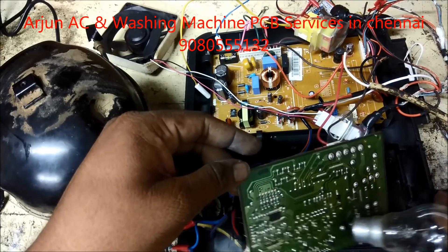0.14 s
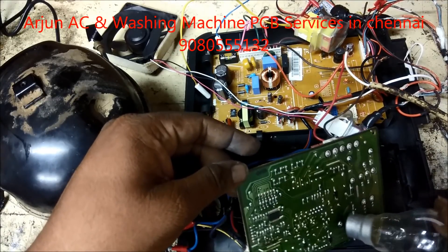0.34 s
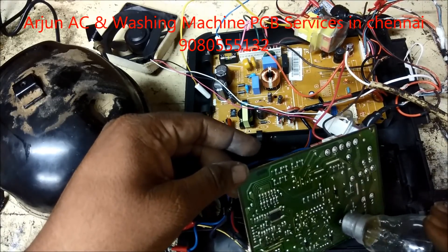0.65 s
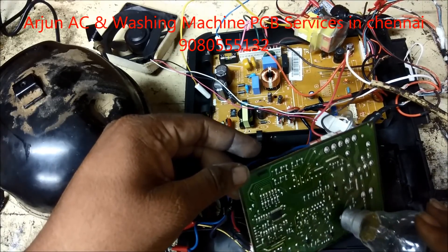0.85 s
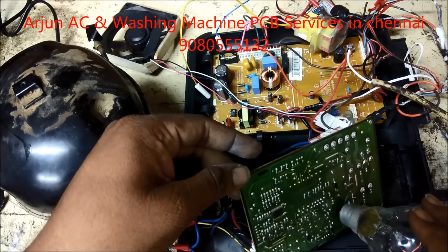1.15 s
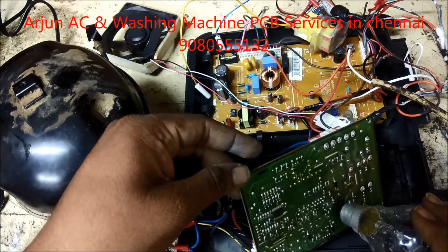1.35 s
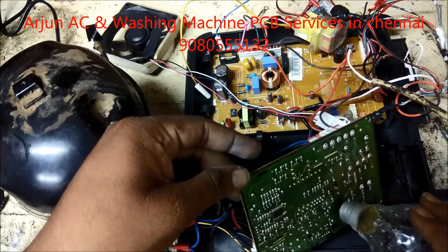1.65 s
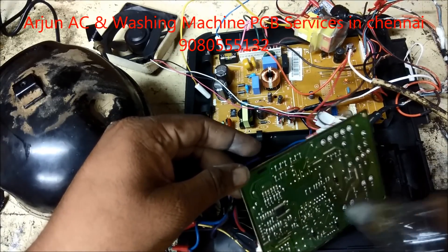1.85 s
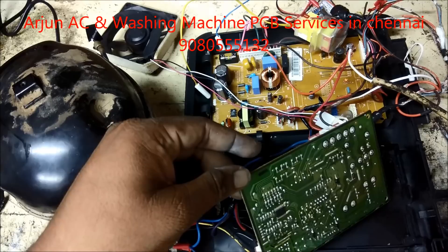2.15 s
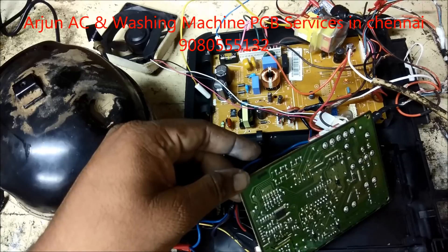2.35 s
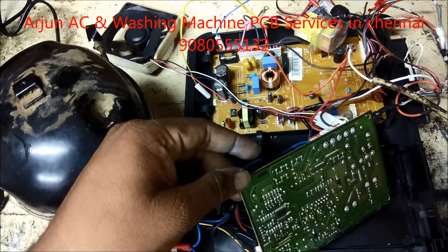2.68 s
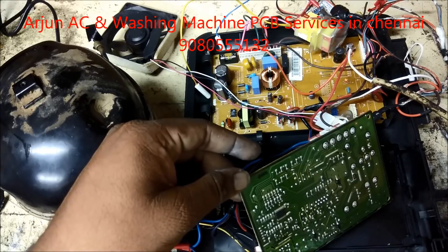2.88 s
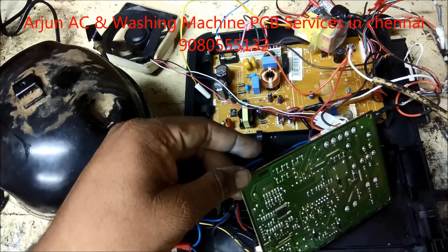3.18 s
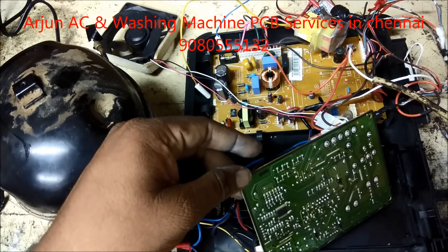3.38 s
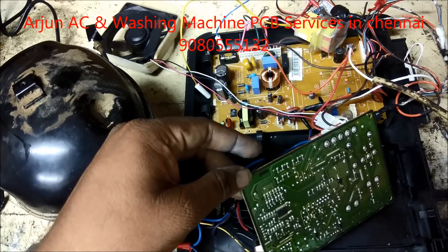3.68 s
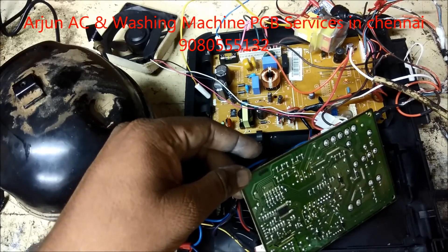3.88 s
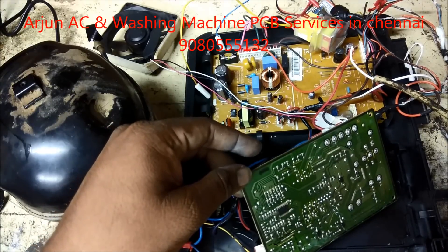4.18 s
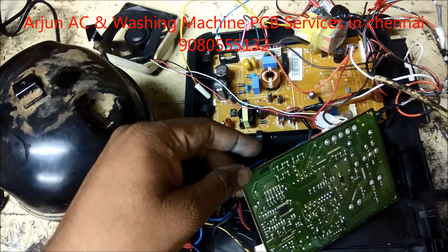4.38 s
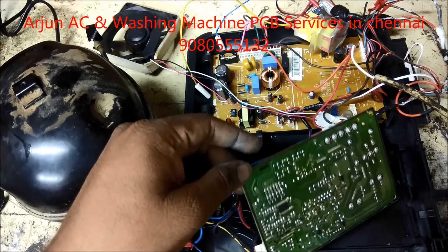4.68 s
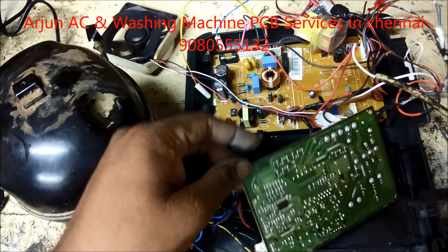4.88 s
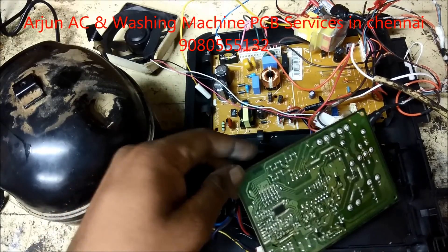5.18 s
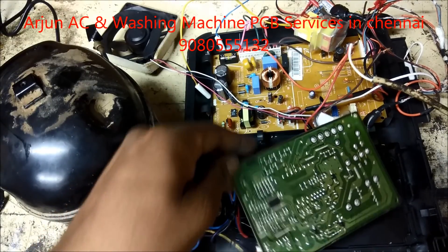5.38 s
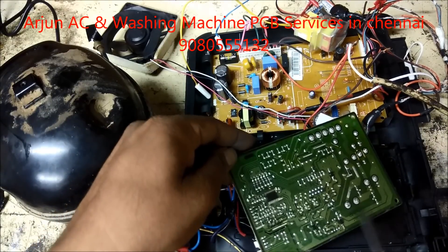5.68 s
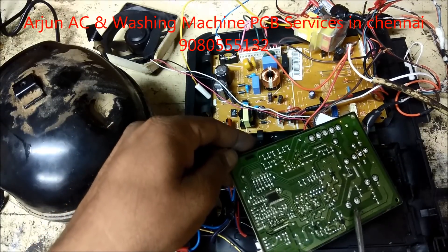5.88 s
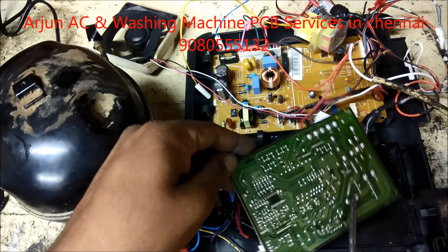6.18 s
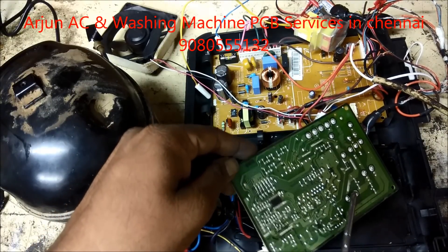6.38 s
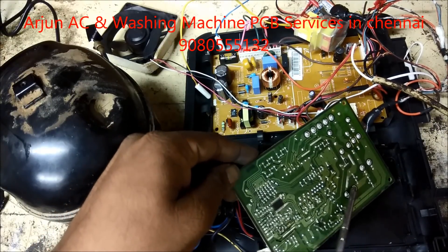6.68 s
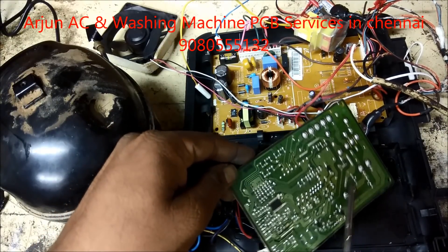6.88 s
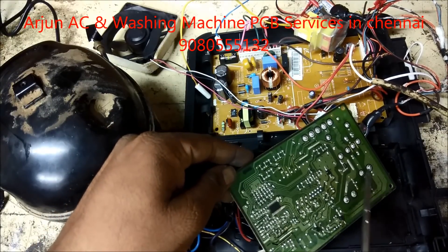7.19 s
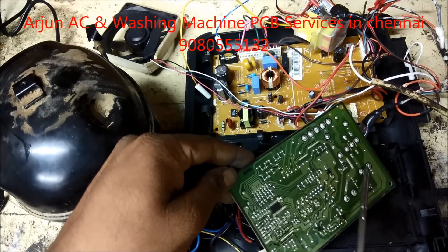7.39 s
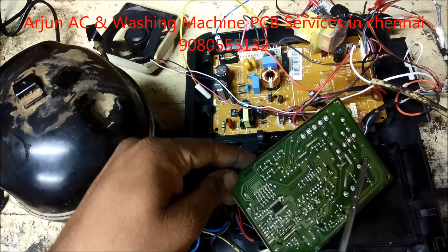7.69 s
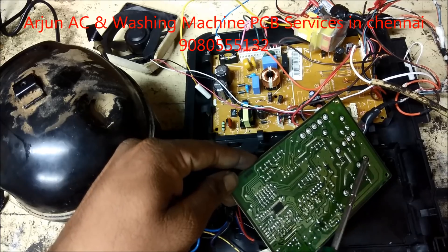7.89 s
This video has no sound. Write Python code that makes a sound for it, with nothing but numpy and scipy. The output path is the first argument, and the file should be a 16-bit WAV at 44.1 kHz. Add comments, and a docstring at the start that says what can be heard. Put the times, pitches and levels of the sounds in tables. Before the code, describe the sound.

In a small workshop a fan hums faintly and ticks about ten times a second, thin and high. A handheld stereo microphone catches low fluttering draught. Soft thumps and light brushing come first, then small taps near four seconds. A rattly cluster builds to one loud hard clack on a circuit board just after five seconds, followed by a few brighter, sparser taps.

```python
"""A small workshop: a circuit board is turned over and tapped with a screwdriver on a cluttered bench.
Knocks are short noise rattles that ring the board's modes; brushing strokes are noise grains ringing small parts.
A fan hums as resonant air noise and ticks about ten times a second in narrow high rings.
Its draught is lumpy low noise and single puffs on the two ports of a handheld microphone; soft low thumps ring too."""
import sys
import numpy as np
from scipy import signal
from scipy.fft import rfft, irfft, next_fast_len
from scipy.io import wavfile

SR = 44100
rng = np.random.default_rng(int(sys.argv[2]) if len(sys.argv) > 2 else 0)


def digitize_waveform(pressure):
    """Quantize a signal to 16-bit integers and store it at the path in sys.argv[1].

    Rows of a 2-D input are taken as channels; values are limited to [-1, 1].
    """
    field = np.atleast_2d(pressure).T
    bounded = np.clip(field, -1, 1)
    quanta = np.round(bounded * 32767).astype(np.int16)
    wavfile.write(sys.argv[1], SR, quanta)


N = 354740


def amp(db):
    """Amplitude factor of a level in dB."""
    return 10 ** (np.asarray(db) / 20)


def rms_one(x):
    """Scale to an RMS of 1."""
    return x / np.sqrt(np.mean(x ** 2) + 1e-20)


def in_time(rows):
    """Columns joined by straight lines, one value a sample."""
    s, *columns = np.transpose(rows)
    return [np.interp(np.arange(N) / SR, s, c) for c in columns]


def pan(pan_db):
    """Left and right dB of a source whose left-right difference is split evenly."""
    return np.array([[pan_db / 2], [-pan_db / 2]])


def port_hit(pan_db):
    """Left and right dB with the louder port at 0 dB."""
    return np.minimum([[pan_db], [-pan_db]], 0)


def band(x, low_hz, high_hz, order=2):
    """Butterworth bandpass."""
    return signal.sosfilt(signal.butter(order, [low_hz, high_hz], "band", fs=SR, output="sos"), x)


def resonance(x, hz, width_hz):
    """Two-pole resonance, about unity gain on top."""
    r = np.exp(-np.pi * width_hz / SR)
    feedback = [1, -2 * r * np.cos(2 * np.pi * hz / SR), r * r]
    return signal.lfilter([(1 - r * r) / 2, 0, (r * r - 1) / 2], feedback, x)


def steep_resonance(x, hz, width_hz):
    """The same resonance twice in series: steeper skirts."""
    return resonance(resonance(x, hz, width_hz), hz, width_hz)


def body(x, modes):
    """Resonances side by side, signs alternating."""
    return sum((-1) ** k * amp(db) * resonance(x, hz, width_hz) for k, (hz, width_hz, db) in enumerate(modes))


def drift(rate_hz):
    """Slow random curve of spread 1: noise through a double lag, computed at SR / 40."""
    r = np.exp(-80 * np.pi * rate_hz / SR)
    white = rng.standard_normal(N // 40 + 2002)
    slow = signal.lfilter([1], [1, -2 * r, r * r], white)[2000:]  # skip the filter's start
    return np.interp(np.arange(N) / 40, np.arange(len(slow)), rms_one(slow))


def bursts(times_s, level_db, t60_s, rise_s):
    """An envelope that rises fast at each time and dies away."""
    marks = np.full(N, 1e-18)
    marks[(np.asarray(times_s) * SR).astype(int)] = amp(level_db)
    decay = signal.lfilter([1], [1, -amp(-60 / (t60_s * SR))], marks)
    rise = np.exp(-1 / (rise_s * SR))
    return signal.lfilter([1 - rise], [1, -rise], decay)


def air_noise(modes, patchy_db, alike):
    """Air noise in housing and room resonances; each flickers on its own; the shared part reaches right later."""
    shared, left, right = rng.standard_normal((3, N))
    lagged = np.array([shared, np.roll(shared, 10)])
    air = np.sqrt(alike) * lagged + np.sqrt(1 - alike) * np.array([left, right])
    out = 0
    for hz, width_hz, left_db, right_db in modes:
        ringing = steep_resonance(air, hz, 1.5 * width_hz) / np.sqrt(width_hz)
        out = out + ringing * amp([[left_db], [right_db]]) * amp(patchy_db * drift(9.2))
    return rms_one(out)


# Hum level over time. Each row: time in seconds, lowest drone in relative dB, drone above it in relative dB.
HUM_LEVELS = [(0.0, -54, -54), (0.65, -64, -62.5), (2.04, -61, -59), (2.78, -55.5, -57), (3.18, -59, -58.5),
              (4.34, -57.5, -63), (4.86, -63.5, -64.5), (5.22, -61.5, -53.5), (5.66, -60, -65),
              (5.98, -65.5, -62.5), (7.59, -66, -67), (8.04, -63.5, -59.5)]
# Upper hum level over time. Each row: time in seconds, relative level in dB.
WHIRR_LEVELS = [(0.0, -58.5), (0.92, -56.5), (1.23, -58.5), (4.77, -57.5), (5.19, -54.5), (5.37, -58),
                (7.72, -63), (8.04, -60)]
# Hum resonances, three groups. Each row: pitch in Hz, nominal width in Hz, left in dB, right in dB.
HUM_LOW_MODES = [(251.6, 41, -17, -10.5), (311, 76, -2.5, -5)]
HUM_MID_MODES = [(458.4, 18, -3, -20), (534.4, 60.4, 7.5, -14), (688.5, 9.7, -23, -14.5)]
HUM_UPPER_MODES = [(941.5, 49, 9, -10.5), (1054.5, 70, -1, 10), (1330, 58, -2.5, 6.5), (1478, 250, 9.5, -4),
                   (1833, 90, -6.5, 0), (2174, 110, 1, -5), (2484, 235, 2.5, -4), (2907, 46, 1, -13),
                   (3470, 48, -21.5, -3), (4614, 70, -26.5, -16)]
HUM_LOW_GAIN_DB, HUM_MID_GAIN_DB, WHIRR_GAIN_DB = 4.5, 8, 1


def fan_hum():
    """Three groups of air resonances, from ports alike at the bottom to mostly independent at the top."""
    low_db, mid_db = in_time(HUM_LEVELS)
    whirr_db = in_time(WHIRR_LEVELS)[0]
    low = amp(low_db + HUM_LOW_GAIN_DB) * air_noise(HUM_LOW_MODES, patchy_db=4.3, alike=1.0)
    mid = amp(mid_db + HUM_MID_GAIN_DB) * air_noise(HUM_MID_MODES, patchy_db=5.17, alike=0.7)
    upper = amp(whirr_db + WHIRR_GAIN_DB) * air_noise(HUM_UPPER_MODES, patchy_db=3.0, alike=0.26)
    return low + mid + upper


# Gusts. Each row: start in seconds, hold in seconds, relative dB at the port hit, left-right in dB.
GUSTS = [(0.006, 0.22, -47.5, 26), (0.34, 0.013, -37, 23), (0.83, 0.031, -43, -32), (1.47, 0.014, -49, -22),
         (1.857, 0.0073, -47, 25), (3.116, 0.048, -44, -29), (3.36, 0.018, -46.5, -26),
         (3.556, 0.022, -40, -24), (4.073, 0.22, -49, 12), (4.255, 0.3, -36, 12), (4.77, 0.15, -35, 27),
         (4.953, 0.34, -40, 2.5), (5.513, 0.037, -32.5, 40), (5.59, 0.051, -43, 16),
         (6.508, 0.076, -46, 27), (6.993, 0.024, -45.5, 32), (7.201, 0.017, -41, 15),
         (7.39, 0.024, -41.5, -7.5), (7.451, 0.13, -38, -34.5), (7.775, 0.077, -46.5, 25),
         (7.87, 0.038, -34, 29)]
GUST_RISE_DB_PER_S, GUST_FALL_DB_PER_S = 799.5, 296.5
CALM_DB, GUST_GAIN_DB = -76, 22.0  # the gain lifts calm and gusts alike


def draught():
    """Lumpy low noise, its own on each port, in the band the ports let through; gusts rise, hold and fall."""
    t, level_db = np.arange(N) / SR, np.full((2, N), float(CALM_DB))
    for s, hold_s, peak_db, pan_db in GUSTS:
        rise_db = -GUST_RISE_DB_PER_S * np.maximum(s - t, 0)
        fall_db = -GUST_FALL_DB_PER_S * np.maximum(t - s - hold_s, 0)
        level_db = np.maximum(level_db, peak_db + rise_db + fall_db + port_hit(pan_db))
    lumps = amp(6.5 * np.clip([drift(30), drift(21)], -3, 1.4))  # the flutter has a ceiling
    push = amp(level_db + GUST_GAIN_DB) * rms_one(lumps * rng.standard_normal((2, N)))
    steady = amp(-50) * band(rng.standard_normal((2, N)), 68, 150, order=3)  # faint rumble underneath
    main = band(push, 117.6, 212.6, order=3)
    lower = amp(-1) * band(push, 88, 107.3, order=3)
    lowest = amp(-19.5) * band(push, 21, 70)
    return steady + main + lower + lowest


def narrow_rings(x, modes):
    """Narrow rings with dark gaps between them."""
    return sum(amp(db) * steep_resonance(x, hz, 1.2 * width_hz) for hz, width_hz, db in modes)


# Fan rotation. Each row: time in seconds, turn count.
FAN_TURNS = [(0.025, 0), (1.69, 17), (4.414, 45), (6.292, 64), (8.057, 82)]
# Ticks that stand out. Each row: turn count, relative level in dB.
LOUD_TICKS = [(0, -50.5), (2, -41), (3, -38), (5, -51), (6, -55), (7, -43), (8, -48.5), (9, -54.5),
              (10, -39), (11, -45), (12, -48.5), (13, -47), (15, -40), (17, -54), (18, -48), (19, -37),
              (20, -49.5), (22, -42), (23, -36.5), (27, -44), (28, -47.5), (30, -40), (31, -41),
              (32, -44.5), (33, -62), (34, -43), (40, -47.5), (41, -37), (42, -47), (43, -43), (44, -44.5),
              (45, -49), (47, -37.5), (48, -38), (50, -51), (52, -38.5), (56, -48), (59, -49), (62, -51),
              (64, -48), (68, -47), (69, -33), (78, -46.5), (79, -41)]
# Tick rings, upper and lower. Each row: pitch in Hz, nominal width in Hz, level in dB.
TICK_UPPER_MODES = [(14400, 300, 0), (15400, 300, -4)]
TICK_LOWER_MODES = [(11535, 350, 3), (9210, 230, -10.5), (6580, 750, -12.5), (4594, 280, -3)]
FAINT_TICK_DB, FAINT_SPREAD_DB = -64.5, 5
TICK_LOWER_DB, LOWER_SPREAD_DB = -11, 4  # relative to the upper rings' drive
TICK_JITTER_S, TICK_LEAD_S, TICK_GAIN_DB = 0.0015, 0.002, 9.0


def ticks():
    """A loose part of the fan is flicked once a turn and jingles in narrow high rings."""
    fan_s, fan_turn = np.transpose(FAN_TURNS)
    s = np.interp(np.arange(fan_turn[-1]), fan_turn, fan_s)
    level_chance, lower_chance, time_chance = rng.standard_normal((len(s), 3)).T
    s = s + TICK_JITTER_S * time_chance - TICK_LEAD_S
    level_db = FAINT_TICK_DB + FAINT_SPREAD_DB * level_chance
    turn, loud_db = np.transpose(LOUD_TICKS)
    level_db[np.round(turn).astype(int)] = loud_db
    lower_db = level_db + TICK_LOWER_DB + LOWER_SPREAD_DB * np.minimum(lower_chance, 1)
    white = rng.standard_normal((2, N))
    upper_drive = white[0] * bursts(s, level_db, t60_s=0.031, rise_s=0.0028)
    lower_drive = white[1] * bursts(s, lower_db, t60_s=0.055, rise_s=0.0006)
    upper = narrow_rings(upper_drive, TICK_UPPER_MODES)
    lower = narrow_rings(lower_drive, TICK_LOWER_MODES)
    return amp(TICK_GAIN_DB) * (upper + lower)


ROOM_T60_S, ROOM_DB = 0.23, 0.5


def room(x):
    """A dense tail of echoes, another one at each port."""
    t = np.arange(SR // 2) / SR
    tail = rng.standard_normal((2, len(t))) * amp(-60 * t / ROOM_T60_S) * np.clip(t / 0.00027, 0, 1)
    tail -= 0.42 * band(tail, 100, 2400, order=1)  # close lows and mids stay drier than the treble
    tail /= np.sqrt(np.sum(tail ** 2, axis=1, keepdims=True))
    return amp(ROOM_DB) * signal.fftconvolve(x, tail, axes=1)[:, :N]


# Soft low thumps, perhaps through the bench.
# Each row: time in seconds, relative peak in dB, ring in Hz, left-right in dB.
THUMPS = [(0.039, -40.5, 540, 10), (0.622, -41.5, 346, -2), (1.6, -37, 334, 3), (1.798, -40, 325, 3),
          (2.594, -31.5, 762, 0), (2.605, -32.5, 333, 3), (2.635, -41.5, 712, 6), (2.664, -36.5, 353, 0),
          (2.893, -43.5, 530, 23), (3.353, -44, 307, 8), (3.576, -34, 744, 6), (3.743, -38.5, 331, 9),
          (3.988, -35, 340, 4), (4.071, -40, 338, 0), (4.108, -38.5, 385, 9), (5.316, -37, 534, -5),
          (6.101, -41, 552, 14), (6.221, -43.5, 316, 6), (6.65, -45, 555, 17), (7.043, -43, 324, 6)]
THUMP_T60_S, THUMP_RISE_S, THUMP_WIDTH_HZ, THUMP_GAIN_DB = 0.078, 0.0014, 62, -2
THUMP_LEAD_S = 0.007  # the ring builds up before it is heard


def thumps():
    """A short puff of noise sets one low resonance ringing."""
    out, t = np.zeros((2, N + SR)), np.arange(SR // 5) / SR
    whites = rng.standard_normal((len(THUMPS), len(t)))
    for (s, level_db, hz, pan_db), white in zip(THUMPS, whites):
        puff = white * (1 - np.exp(-t / THUMP_RISE_S)) * amp(-60 * t / THUMP_T60_S)
        ringing = steep_resonance(puff, hz, THUMP_WIDTH_HZ)
        ringing = ringing / np.abs(ringing).max()
        at = int((s - THUMP_LEAD_S) * SR)
        out[:, at:at + len(t)] += amp(level_db + THUMP_GAIN_DB + pan(pan_db)) * ringing
    return out[:, :N]


GRIT_DB = 4  # scale of the random boost of single grains, in knocks and slides


def grit(shape):
    """Random boost of single noise grains."""
    return amp(GRIT_DB * np.minimum(rng.exponential(1, shape), 5))


# Knocks. Each row: time in seconds, relative level in dB, centre of the colour in Hz,
# fall away from it in dB per octave, left-right in dB, ring in dB.
KNOCKS = [(0.947, -26, 9400, 15, 1, 0), (2.935, -33.5, 3850, 9, -7.5, -1),
          (3.574, -28.5, 5130, 5, -11.5, 0), (3.682, -34.5, 6800, 3, 1, -13),
          (3.976, -21, 6800, 9.5, 4, -13), (4.873, -44, 960, 5, -6, 25.5),
          (4.907, -38.5, 1450, 9.5, 2, 18.5), (4.95, -26.5, 1370, 12, 1, -12.5),
          (5.009, -15.5, 1620, 6, 0, -0.5), (5.034, -30, 1790, 7, 1.5, -7),
          (5.074, -24.5, 1100, 6.5, 4, -6), (5.11, -19.5, 900, 9.5, -5, -5),
          (5.117, -19, 650, 9.5, 14, -6.5), (5.133, -25, 650, 12.5, 1.5, -9.5),
          (5.155, -31, 650, 5, 3, -11), (5.22, 0, 1490, 8, -1.5, -3), (5.224, -10, 1570, 9.5, 1, -5.5),
          (5.237, -18, 696, 12, 10, -13), (5.255, -15, 600, 15.5, 1, 0), (5.261, -25, 4540, 3.5, 6, 0),
          (5.317, -28, 3370, 1, 3, -8), (5.388, -32.5, 8900, 7.5, 1.5, 10.5),
          (5.59, -10, 5300, 7.5, 4.5, 8.5), (6.263, -40.5, 962, 27, 5, 22), (6.493, -27, 8200, 9, 4.5, -6),
          (6.894, -30, 4970, 2.5, 2.5, 1), (7.185, -15.5, 5240, 9, 2, 21), (7.194, -39, 4100, 2, -11, 13),
          (7.287, -34.5, 5740, 8, -3, -7)]
# Contact noise bands. Each row: low edge in Hz, high edge in Hz, contact t60 in seconds.
KNOCK_BANDS = [(756, 1600, 0.019), (236, 810, 0.04), (1950, 3270, 0.016), (3073, 4900, 0.027),
               (4577, 7800, 0.021), (9100, 14600, 0.029)]
# Board modes. Each row: pitch in Hz, width in Hz, level in dB.
BOARD_MODES = [(550, 31, 0.5), (924, 27, 3), (1045, 43, -3.5), (1380, 110, 4.5), (1570, 80, -0.5),
               (1715, 150, 0), (2183, 80, 0), (2340, 140, 5), (2810, 160, -3), (3270, 110, -5.5),
               (3860, 450, -8)]
KNOCK_RISE_CYCLES = 1.6  # of the centre pitch: dull knocks start softer
RINGS_BELOW_HZ, TAP_RING_HZ = 1500, 1010  # duller knocks ring at their centre, brighter ones at TAP_RING_HZ
KNOCK_RING_WIDTH_HZ = 90
TAP_THUD_DB = -24  # a bright tap hardly moves the bench
TAP_DIP_DB, TAP_DIP_HZ = -2, 2600  # nor does it stir the board's bending modes around this pitch much
MODE_SPREAD_DB, MODE_SHIFT = 2.5, 0.02  # hold and hit point change each mode's strength and pitch
LOUD_DB, DRIER_PER_DB = -7.5, 0.54  # knocks above this level are nearer and stir the room less


def knocks():
    """Contacts are short noise rattles around a centre; the part hit rings. Returns direct sound, room share."""
    out, t = np.zeros((2, 2, N)), np.arange(SR // 5) / SR
    whites = rng.standard_normal((len(KNOCKS), len(t)))
    contacts = np.minimum(rng.standard_normal((len(KNOCKS), len(t) // 60)), 1)
    whites *= amp(5 * np.repeat(contacts, 60, axis=1))  # uneven micro-contacts
    whites *= grit(whites.shape)
    holds = rng.standard_normal((len(KNOCKS), len(BOARD_MODES), 2))
    for (s, level_db, centre_hz, fall_db, pan_db, ring_db), white, hold in zip(KNOCKS, whites, holds):
        rattle, rising = 0, 1 - np.exp(-t * centre_hz / KNOCK_RISE_CYCLES)
        for low_hz, high_hz, t60_s in KNOCK_BANDS:
            octaves = abs(np.log2(np.sqrt(low_hz * high_hz) / centre_hz))
            thin_db = TAP_THUD_DB if centre_hz > 5 * high_hz else 0
            if low_hz < TAP_DIP_HZ < high_hz and centre_hz > 1.5 * TAP_DIP_HZ:
                thin_db += TAP_DIP_DB
            shape = rising * amp(thin_db + level_db - fall_db * octaves - 60 * t / t60_s)
            # scaled up to stay clear of the floor in rms_one
            noise = band(1e3 * white * shape / shape.max(), low_hz, high_hz, order=3)
            rattle = rattle + rms_one(noise) * np.sqrt(np.mean(shape ** 2))
        ring_hz = centre_hz if centre_hz < RINGS_BELOW_HZ else TAP_RING_HZ
        rattle = rattle + amp(ring_db) * resonance(rattle, ring_hz, KNOCK_RING_WIDTH_HZ)
        modes = [(hz * (1 + MODE_SHIFT * shift), width_hz, db + MODE_SPREAD_DB * spread)
                 for (hz, width_hz, db), (shift, spread) in zip(BOARD_MODES, hold)]
        knock = amp(-5.5) * rattle + body(rattle, modes)
        at = int((s - 0.001) * SR)
        sent_db = -DRIER_PER_DB * max(level_db - LOUD_DB, 0)
        out[..., at:at + len(t)] += knock * amp(pan(pan_db)) * amp([[[0]], [[sent_db]]])
    return out


# Fingers and wires brushing the board.
# Each row: start in seconds, hold in seconds, relative level in dB, low edge in Hz, high edge in Hz, t60 in seconds.
SLIDES = [(2.29, 0, -54, 10000, 15700, 0.27), (2.337, 0.036, -42, 10800, 15000, 0.09),
          (2.472, 0.033, -44.5, 10800, 14700, 0.17), (2.83, 0.0067, -50.5, 2340, 4070, 0.048),
          (2.921, 0.0075, -53, 5400, 14700, 0.066), (2.92, 0, -49.5, 2760, 5700, 0.076),
          (3.203, 0.0071, -55.5, 2920, 13600, 0.2), (3.533, 0.029, -50.5, 2800, 15700, 0.17),
          (3.568, 0, -32.5, 3250, 14400, 0.034), (5.629, 0, -63.5, 2770, 11100, 1),
          (6.282, 0.047, -60.5, 3300, 6260, 0.19)]
SLIDE_RISE_S, SLIDE_SWELL = 0.00084, 0.21  # swell: share of the hold that a long stroke adds to its rise
SLIDE_UNDER_DB = -10  # the octave below a stroke's band sounds weaker


def slides():
    """Friction grains swell, hold and fade under each stroke and make many small parts ring."""
    grain = rng.standard_normal(N) * amp(4 * drift(120)) * grit(N)
    parts = [(hz, 110, db) for hz, db in zip(np.geomspace(2600, 15500, 44), rng.normal(0, 3, 44))]
    grain = amp(-3) * grain + body(grain, parts)
    out, since_s = np.zeros(N), np.arange(SR // 2) / SR
    for s, hold_s, level_db, low_hz, high_hz, t60_s in SLIDES:
        lag = np.exp(-1 / ((SLIDE_RISE_S + SLIDE_SWELL * hold_s) * SR))
        stroke = amp(level_db - 60 * np.maximum(since_s - hold_s, 0) / t60_s)
        # a double lag rounds the start of the stroke
        stroke = signal.lfilter([(1 - lag) ** 2], [1, -2 * lag, lag * lag], stroke)
        at = int((s - SLIDE_RISE_S) * SR)
        rub = grain[at:at + len(since_s)]
        main = rms_one(band(rub, low_hz, high_hz, order=3))
        under = amp(SLIDE_UNDER_DB) * rms_one(band(rub, low_hz / 2, low_hz, order=3))
        out[at:at + len(since_s)] += stroke * (main + under)
    return out


# Single puffs of the draught.
# Each row: time in seconds, peak in dB before the band filter, pitch in Hz, left-right in dB.
PUFFS = [(4.242, -30, 151, 33), (4.29, -19, 187, 38), (4.336, -22, 173, 16), (4.403, -33, 140, 15),
         (4.443, -44, 179, 18), (4.543, -19, 185, 26)]
PUFF_CYCLES = 0.85  # spread of the swell


def puffs():
    """A cycle or two of low pressure swing, strongest at the port that is hit."""
    out = np.zeros((2, N))
    for (s, level_db, hz, pan_db), phase in zip(PUFFS, rng.random(len(PUFFS))):
        cycles = np.arange(-2000, 2000) / SR * hz
        swell = np.exp(-2 * (cycles / PUFF_CYCLES) ** 2)
        swing = swell * np.cos(2 * np.pi * (cycles + phase))
        at = int(s * SR) - len(cycles) // 2
        out[:, at:at + len(cycles)] += swing * amp(level_db + port_hit(pan_db))
    return band(out, 95, 500)


def scene():
    """Handling and ticks in the room, hum around, draught at the ports."""
    fan = fan_hum()
    near, sent = knocks() + slides() + thumps() + ticks() * amp(pan(6))
    near[0] = np.roll(near[0], 3)  # the bench is a few centimetres nearer to the right port
    return near + room(sent) + fan + draught() + puffs()


# Port balance. Each row: pitch in Hz, left over right in dB (rises are scaled in record).
PORT_TILT = [(300, -2), (3000, -2), (5000, -7), (7000, 4), (12000, 13), (16000, 11.5)]
# Hiss gain. Columns: left in dB, right in dB.
HISS_GAINS_DB = [-74, -78]
CUTOFF_HZ = 16900


def record(dry):
    """The left port hears more treble than the right; the electronics hiss; the top is cut."""
    hz, tilt_db = np.transpose(PORT_TILT)
    size = next_fast_len(N)
    tilt_db = np.interp(np.log(np.fft.rfftfreq(size, 1 / SR) + 1), np.log(hz), tilt_db)
    left_favoured_db = np.outer([0.54, -0.7], np.maximum(tilt_db, 0))
    right_favoured_db = np.outer([0.5, -0.5], np.minimum(tilt_db, 0))
    ports = irfft(rfft(dry, size) * amp(left_favoured_db + right_favoured_db), size)[:, :N]
    white, edges_hz = rng.standard_normal((2, N)), np.geomspace(300, 15900, 9)
    hiss = 0
    for k in range(len(edges_hz) - 1):  # flickers band by band
        hiss = hiss + (-1) ** k * band(white, *edges_hz[k:k + 2]) * amp(1.9 * drift(8))
    hiss = amp(HISS_GAINS_DB)[:, None] * hiss
    return signal.sosfilt(signal.cheby2(12, 70, CUTOFF_HZ, fs=SR, output="sos"), ports + hiss)


dry = scene()
out = record(dry)
digitize_waveform(out)
```